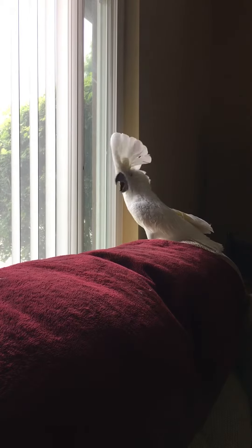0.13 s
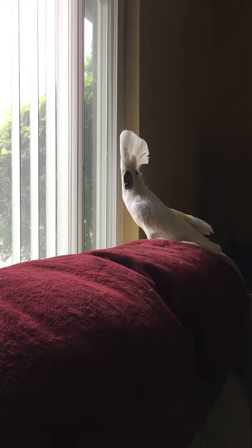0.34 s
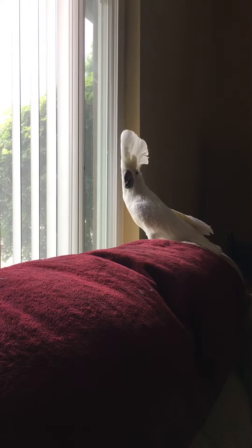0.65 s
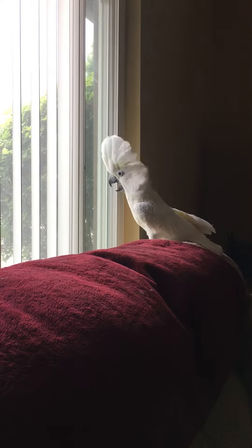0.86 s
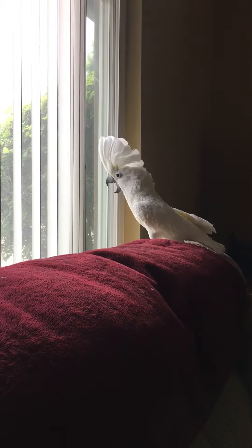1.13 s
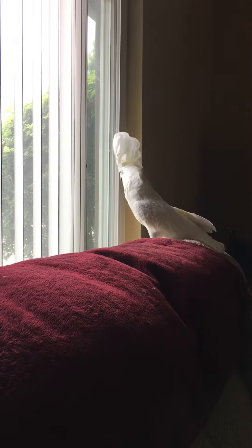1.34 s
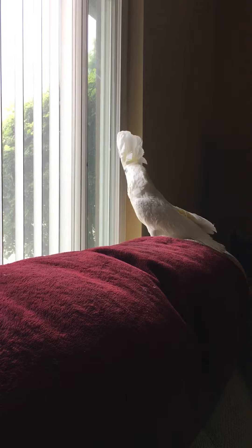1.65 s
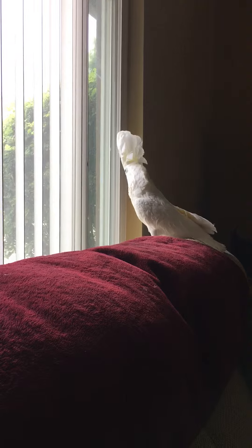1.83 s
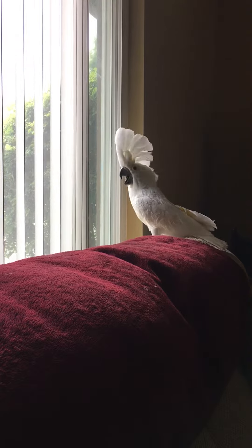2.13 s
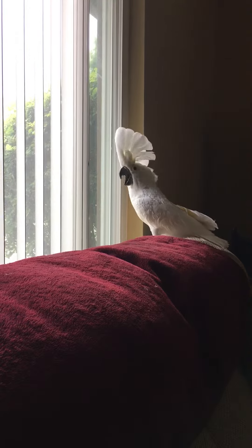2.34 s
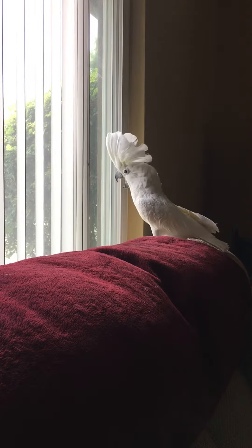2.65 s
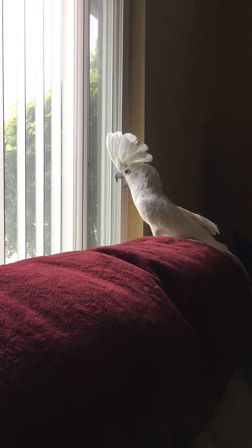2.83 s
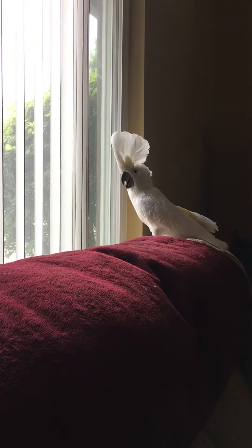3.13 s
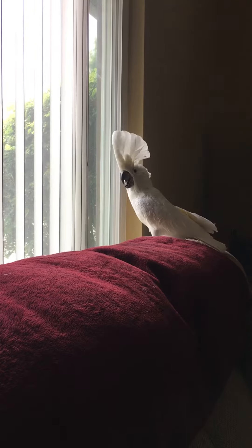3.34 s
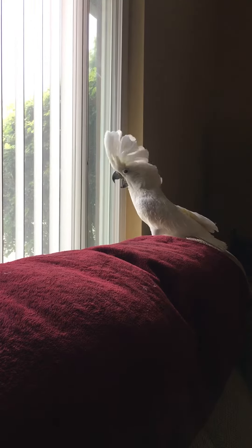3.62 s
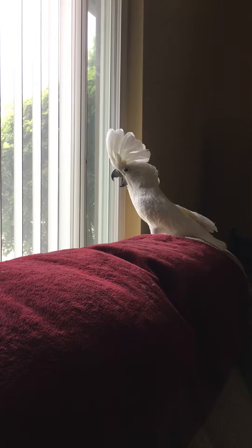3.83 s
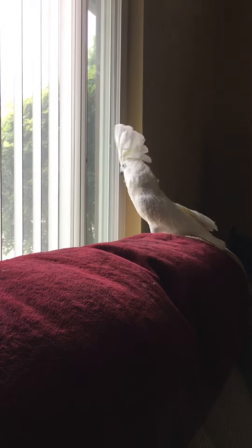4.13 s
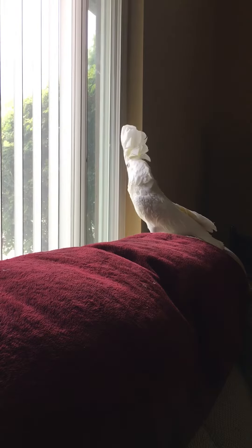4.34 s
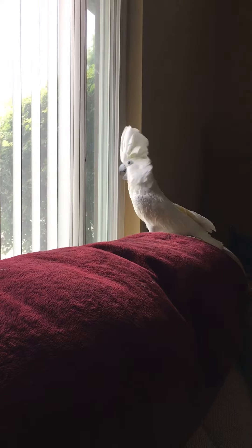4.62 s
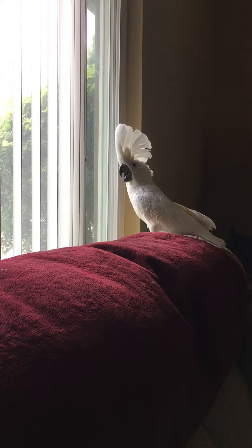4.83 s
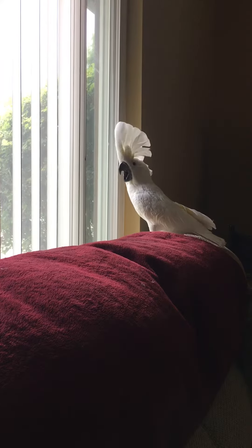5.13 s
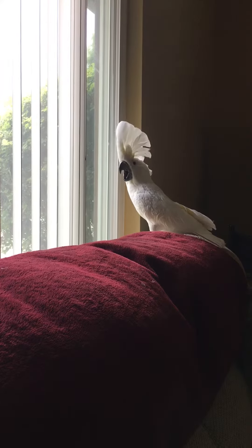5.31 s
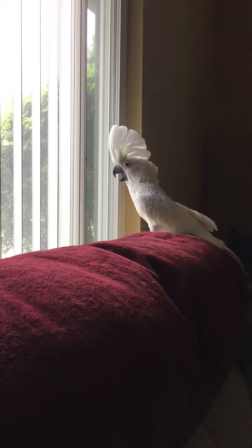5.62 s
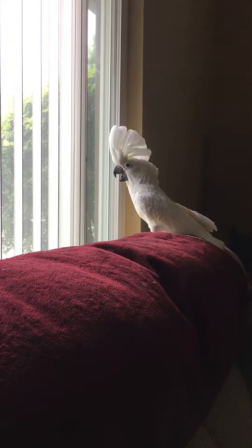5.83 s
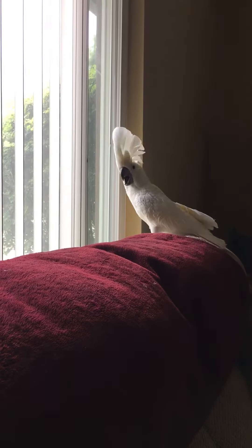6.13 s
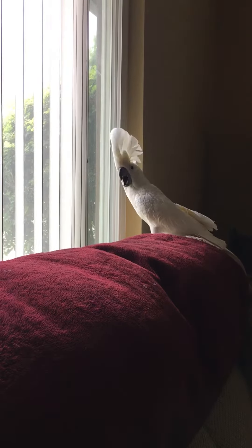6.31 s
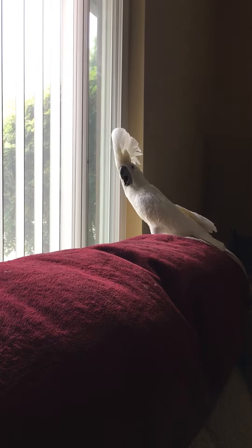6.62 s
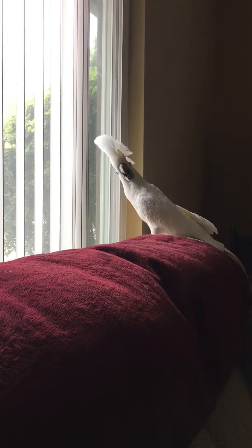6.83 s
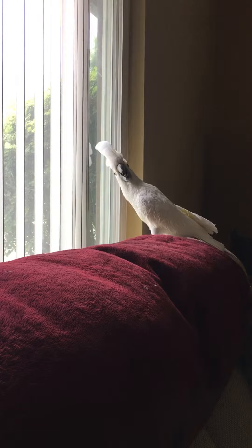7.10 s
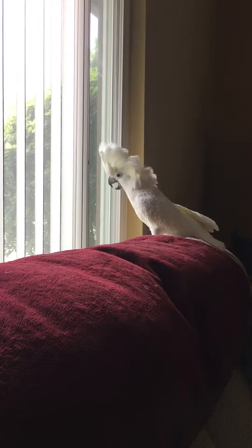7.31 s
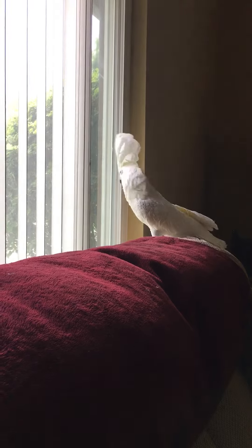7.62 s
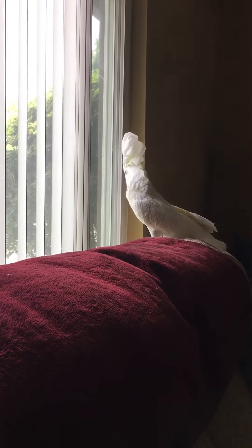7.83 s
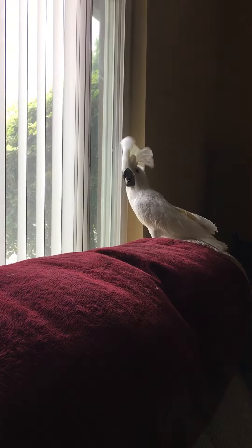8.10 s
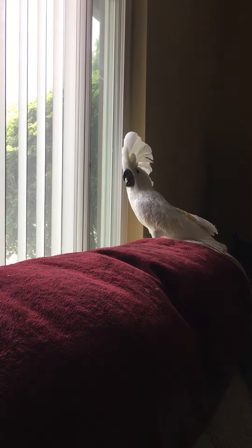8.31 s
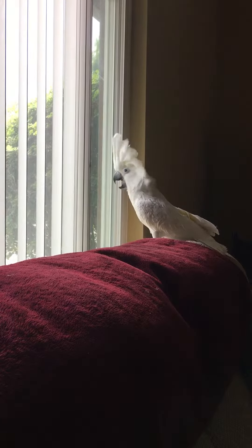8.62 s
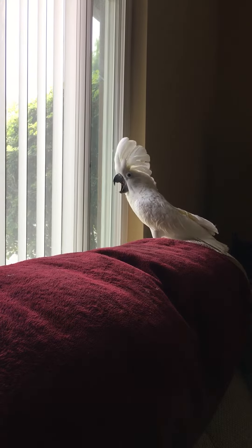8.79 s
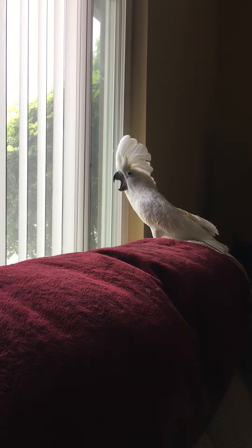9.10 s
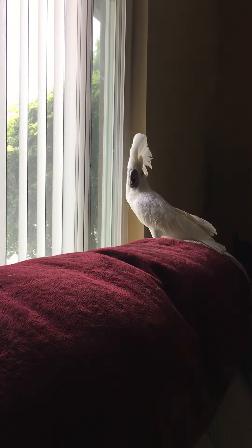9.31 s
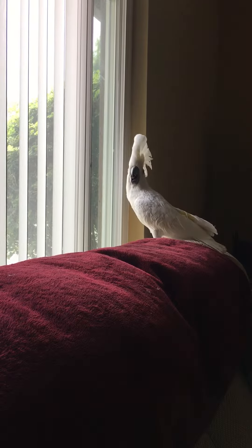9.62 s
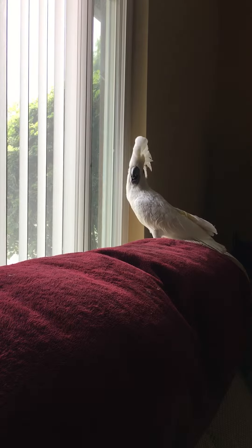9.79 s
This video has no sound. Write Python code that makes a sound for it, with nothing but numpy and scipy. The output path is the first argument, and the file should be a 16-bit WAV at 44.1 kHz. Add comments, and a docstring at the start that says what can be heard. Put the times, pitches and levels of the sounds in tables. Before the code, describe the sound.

A cockatoo screams over and over in a living room, piercing and raspy-ended, while a small dog yelps and whines further back.

```python
"""In a living room, a cockatoo on a sofa back screeches again and again, close by.
Each cry sweeps up into a piercing tone, may crack, and falls away in a rasp; thin whistles edge a few.
Its voice is a train of pulses, roughened and mixed with breath noise, then shaped by throat and beak.
Further back another animal, probably a small dog, joins in: hoarse yelps and thin gliding howls.
A soft knock, faint room noise and a wavering hum lie underneath; the room echoes both animals."""
import sys
import numpy as np
from scipy import signal
from scipy.fft import rfft, irfft
from scipy.io import wavfile
from scipy.ndimage import uniform_filter1d, minimum_filter1d

SR = 44100
rng = np.random.default_rng(int(sys.argv[2]) if len(sys.argv) > 2 else 0)


def wrap_up_sound(samples):
    """Save the sound to the file named by the first command line argument, as 16-bit audio."""
    columns = np.atleast_2d(samples).T
    # keep every value between -1 and 1, then stretch to whole-number steps
    tamed = np.clip(columns, -1, 1)
    steps = np.round(tamed * 32767).astype(np.int16)
    wavfile.write(sys.argv[1], SR, steps)


N = 438794
T = np.arange(N) / SR  # time of every sample, in s
CRACK_EDGE_S = 0.018  # fade at both ends of a crack or a strong-weak stretch


def undb(db):
    """Turn decibels into a gain."""
    return 10 ** (np.asarray(db) / 20)


def unit(x):
    """Scale to rms 1."""
    return x / np.sqrt(np.mean(x ** 2) + 1e-18)


def steady(x, size=1500):
    """Hold the running rms at 1, over a window of size samples."""
    return x / np.sqrt(uniform_filter1d(x ** 2, size) + 1e-12)


def at(points, hz):
    """Read (Hz, value) points on a log-frequency axis."""
    f, value = np.transpose(points)
    return np.interp(np.log(np.maximum(hz, 1)), np.log(f), value)


def ramp(t, length_s):
    """Rise from 0 to 1 over the given time."""
    return np.clip(t / length_s, 0, 1)


def during(start, end):
    """Find the samples between two moments, and their times."""
    span = np.flatnonzero((T >= start) & (T <= end))
    return span, T[span]


def colour(x, points, size=1024):
    """Filter with the given (Hz, dB) response, without sounding ahead of time."""
    log_gain = np.log(undb(at(points, np.fft.rfftfreq(size, 1 / SR))))
    # folding the cepstrum forward in time gives the most prompt filter with this response
    cepstrum = irfft(log_gain)
    cepstrum[1:size // 2] *= 2
    cepstrum[size // 2 + 1:] = 0
    response = irfft(np.exp(rfft(cepstrum)))
    return signal.fftconvolve(x, response)[:len(x)]


def below(x, hz, order=6):
    """Low-pass without delay."""
    sos = signal.butter(order, min(hz, 0.45 * SR), fs=SR, output="sos")
    return signal.sosfiltfilt(sos, x)


def wobble(n, hz):
    """Random motion up to about the given speed, rms 1."""
    sos = signal.butter(4, hz, fs=SR, output="sos")
    return unit(signal.sosfilt(sos, rng.standard_normal(n)))


def pulses(hz, count=24):
    """One sharp pulse per cycle, summed from overtones, and the phase of the cycle."""
    phase = 2 * np.pi * np.cumsum(hz) / SR
    wave = 0
    for k in range(1, count + 1):
        # overtones fade out just below the highest frequency that can be stored
        fade = np.clip((SR / 2 - k * hz) / 2000, 0, 1)
        wave = wave + np.cos(k * phase) * fade
    return wave, phase


def perform(voice, *tables):
    """Lay all calls of one voice on the time line."""
    out = np.zeros(N)
    for controls in zip(*tables):
        span, call = voice(*controls)
        out[span] += call
    return out


def background(floor_db=-60, hum_hz=57.4, hum_db=-60.5):
    """Soft coloured noise of a quiet room, and the wavering hum of an appliance."""
    # tone of the quiet room, overall level set apart: f/Hz, relative level/dB
    room_tone = [(20, -23), (45, -14.5), (65, -2), (90, -14), (200, -19.5), (500, -21), (2000, -29.5),
                 (8000, -36), (15000, -45.5)]
    hum = unit(np.sin(2 * np.pi * hum_hz * T) * (1 + 0.15 * wobble(N, 3.4)))
    noise = unit(colour(rng.standard_normal(N), room_tone))
    return undb(floor_db) * noise + undb(hum_db) * hum


def effort(t, row, held_pitch):
    """One screech's course: tighten up to pitch, hold, then run out of pressure in a rasp."""
    # the voice cracks in mid-cry: start/s, end/s, roughness (0-1), level change/dB
    crack_rows = [(-0.02, 0.066, 0.47, 8), (0.062, 0.119, 0.65, -0.5), (2.405, 2.462, .6, 1.5),
                  (3.736, 3.773, 0.39, -1.5), (3.94, 4.064, 0.55, -3), (4.094, 4.157, 0.37, -3.5),
                  (5.19, 5.251, 0.51, -4), (8.763, 8.895, 0.75, -0.5), (8.993, 9.051, 0.68, -5.5),
                  (9.78, 10.1, 0.76, -2.5)]
    sweep_depth, sweep_curve = 0.48, 3.1  # share of the pitch missing at the start
    attack_s, attack_db, attack_curve = 0.083, -21.5, 3.12
    settle_s, held_rough = 0.16, 0.03  # roughness clears to this small rest
    waver_hz, waver_share = 14.02, 0.00401
    tongue_hz, tongue_db = 13, 1.8
    break_s, rasp_rough, rasp_fall_per_s = 0.025, 0.78, 1.5
    rasp_fade_db_per_s, rasp_throat_db, rasp_treble_db = -88.5, 3.5, -0.5

    start, breaks, end, sweep_s, onset_rough, early_db, late_db, rasp_db, *colours, _ = row
    age, spent = t - start, np.maximum(t - breaks, 0)
    rasp = ramp(spent, break_s)
    cracks = [(ramp(np.minimum(t - a, b - t), CRACK_EDGE_S), depth, db) for a, b, depth, db in crack_rows]

    def across(early_late):
        return np.interp(t, [start, breaks], early_late)

    def slow_motion(hz):
        # drawn over two seconds, so that short cries get a fair share of slow motion
        return wobble(2 * SR, hz)[-len(t):]

    # pitch
    sweep = 1 - sweep_depth * (1 - ramp(age, sweep_s)) ** sweep_curve
    hz = np.interp(t, *np.transpose(held_pitch)) * sweep * np.exp(-rasp_fall_per_s * spent)
    hz = hz * (1 + waver_share * slow_motion(waver_hz))
    # level
    level_db = across([early_db, late_db])
    level_db = level_db + attack_db * (1 - ramp(age, attack_s)) ** attack_curve
    level_db = level_db + sum(on * db for on, _, db in cracks)
    level_db = level_db + rasp_db * rasp + rasp_fade_db_per_s * spent
    # tongue and beak never hold quite still
    throat_db = across(colours[:2]) + rasp_throat_db * rasp + tongue_db * slow_motion(tongue_hz)
    treble_db = across(colours[2:]) + rasp_treble_db * rasp + tongue_db * slow_motion(tongue_hz)
    # roughness
    rough = held_rough + onset_rough * (1 - ramp(age, settle_s)) + rasp_rough * rasp
    rough = np.maximum(rough, sum(on * depth for on, depth, _ in cracks))
    return hz, level_db, throat_db, treble_db, rough


def screech(row, held_pitch, beak_hz=4250, beak_half_width_hz=380, jitter=0.0643, jitter_hz=330,
            quiver=0.0021, shimmer=0.13, creak=0.78, drift=1.1):
    """The syrinx, a bird's voice organ, pulses cleanly or roughly; throat and beak ring with it."""
    # windpipe, throat and open beak: f/Hz, level/dB
    bird_tract = [(200, -33.5), (600, -20), (1050, -15), (1500, -6), (2100, -0.5), (2600, -3.5), (3200, 1),
                  (4200, -6.5), (5200, -8.5), (6200, -14.5), (7800, -18.5), (9600, -30), (12500, -35.5),
                  (15500, -46.5)]
    # the syrinx beats strong-weak, adding lines at half the pitch: start/s, end/s, depth (half the swing)
    doubling_rows = [(3.672, 3.7, 0.6), (3.994, 4.18, 0.39), (8.863, 9.047, 0.3)]
    start, _, end, *_, beak_db = row
    span, t = during(start, end)
    hz, level_db, throat_db, treble_db, rough = effort(t, row, held_pitch)
    n = len(span)

    # the tone stays pure until the strain is high, then breaks up quickly
    rough = np.clip(rough, 0, 1)
    chaos = rough ** 2 * (2 - rough)
    # slack membranes flap unevenly until they tighten onto the pitch
    chaos = np.maximum(chaos, np.clip((900 - hz) / 400, 0, 0.5))
    hz = hz * (1 + quiver * wobble(n, 93) + jitter * chaos * wobble(n, jitter_hz))
    wave, phase = pulses(hz)

    # the weak beat comes and goes and lags unevenly, so the half lines waver
    doubling = sum(depth * ramp(np.minimum(t - a, b - t), CRACK_EDGE_S) for a, b, depth in doubling_rows)
    half_cycle = np.cos(phase / 2 + 0.88 * wobble(n, 41))
    weak_beat = doubling * (1 + 0.56 * wobble(n, 49)) * half_cycle
    wave = unit(wave) * (1 + 2 * weak_beat)

    # turbulence escapes once a cycle and grows with the chaos
    air = unit(rng.standard_normal(n) * (1 + np.cos(phase)))
    noisy = 0.6 * chaos ** 2
    source = np.sqrt(1 - noisy) * wave + np.sqrt(noisy) * air
    # under strain the membranes slam in loose groups of four cycles: a torn, creaking rasp
    groups = np.exp(creak * chaos * np.cos(phase / 4 + drift * wobble(n, 50)))
    flicker = 1 + shimmer * chaos * wobble(n, 290)
    voice = colour(source * groups * flicker, bird_tract)

    # tongue and beak shift the weight between three bands
    low, up_to_mid = below(voice, 2502), below(voice, 3824)
    treble = voice - up_to_mid
    peak = signal.iirpeak(beak_hz, beak_hz / beak_half_width_hz / 2, fs=SR)
    treble = treble + (undb(beak_db) - 1) * signal.filtfilt(*peak, treble)
    throat = undb(throat_db) * steady(up_to_mid - low)
    mixed = steady(low) + throat + undb(treble_db) * steady(treble)
    edges = ramp(np.minimum(t - start, end - t), 0.036)
    return span, edges * undb(level_db) * mixed


def dog_voice(hz, rough, jitter=0.117, jitter_hz=140, quiver=0.0078, shimmer=0.06,
              second_db=-12, overtones_db=-13, air_db=-11):
    """The dog's vocal folds and throat, from hoarse to clear; rms 1."""
    # the dog's throat, as it colours the overtones: f/Hz, level/dB
    dog_tract = [(300, -22), (600, -22.5), (900, -13.5), (1220, 9), (1400, 4.5), (1560, 8.5), (1750, -8),
                 (2100, -8), (2500, 4.5), (3400, -19), (5000, -19.5), (6500, -13), (9000, -26.5),
                 (15000, -43.5)]
    n, rough = len(hz), np.clip(rough, 0, 1)
    hz_shaken = hz * (1 + quiver * wobble(n, 35) + jitter * rough * wobble(n, jitter_hz))
    wave, phase = pulses(hz_shaken)
    # the octave lights up as it slides through the throat resonance
    octave = undb(second_db + at(dog_tract, 2 * hz)) * np.sin(2 * phase)
    clear = unit(np.cos(phase) + octave)
    # only when the folds slap shut do upper overtones and breath noise join in
    slap = unit(colour(wave - np.cos(phase), dog_tract))
    air = unit(colour(rng.standard_normal(n) * (1 + np.cos(phase)), dog_tract))
    voice = clear + rough * (undb(overtones_db) * slap + undb(air_db) * air)
    return steady(voice * (1 + shimmer * rough * wobble(n, 130)))


def bark(row):
    """A short, hoarse yelp: pitch leaps up, loudness peaks early and fades."""
    start_hz, rise_s = 712.3, 0.027
    attack_s, attack_db, fade_db_per_s, release_s = 0.035, -30, -100, 0.03
    rough_shares = [1.7, 0.75, 1.2]  # gruff at first, clearest at its peak
    start, length, top_hz, level_db, rough = row
    span, t = during(start, start + length)
    age = t - start
    rough = rough * np.interp(age, [0, attack_s, length], rough_shares)
    hz = top_hz + (start_hz - top_hz) * np.exp(-age / rise_s)
    level_db = level_db + attack_db * (1 - ramp(age, attack_s))
    level_db = level_db + fade_db_per_s * np.maximum(age - attack_s, 0)
    return span, undb(level_db) * ramp(length - age, release_s) * dog_voice(hz, rough)


def howl(row):
    """A thin, clear tone that slides to a held pitch, then bends ever faster to its last one."""
    slide_s, bend_curve, fade_db_per_s = 0.11, 1.6, -10.5
    attack_s, release_s, first_rough, held_rough = 0.025, 0.06, 0.38, 0.08
    start, end, first_hz, held_hz, last_hz, first_db, held_db = row
    span, t = during(start, end)
    age = t - start
    slide = 1 - ramp(age, slide_s)
    bend = ramp(age - slide_s, end - start - slide_s) ** bend_curve
    hz = held_hz + (first_hz - held_hz) * slide + (last_hz - held_hz) * bend
    gain = undb(held_db + (first_db - held_db) * slide + fade_db_per_s * age)
    edges = ramp(age, attack_s) * ramp(end - t, release_s)
    return span, gain * edges * dog_voice(hz, held_rough + (first_rough - held_rough) * slide)


def whistle(row, overtone_db=-38, edge_s=0.062, curve=4.1):
    """A nearly pure tone from the syrinx that glides and levels off."""
    start, end, first_hz, last_hz, level_db = row
    span, t = during(start, end)
    hz = last_hz + (first_hz - last_hz) * (1 - ramp(t - start, end - start)) ** curve
    wave, phase = pulses(hz * (1 + 0.0057 * wobble(len(span), 93)), count=9)
    gain = undb(level_db) * ramp(np.minimum(t - start, end - t), edge_s)
    return span, gain * (unit(np.sin(phase)) + undb(overtone_db) * unit(wave))


def knocks(rise_s=0.03):
    """Something bumps softly and hums for a moment: a decaying sine with a soft start."""
    # soft knocks, t60 being the time to fade by 60 dB: t/s, f/Hz, level before the fade/dB, t60/s
    bumps = [(3.74, 188, -33, 0.37)]
    out = np.zeros(N)
    for start, hz, db, t60 in bumps:
        age = np.maximum(T - start, 0)
        gain = undb(db - 60 * age / t60) * ramp(age, rise_s)
        out += gain * np.sin(2 * np.pi * hz * age)
    return out


def room(x, direct_db, early_db, tail_db, early_s):
    """Direct sound, scattered early reflections, and a tail whose bands fade at their own speeds."""
    # how long the living room rings, as time to fade by 60 dB: f/Hz, t60/s
    ring_times = [(200, 0.13), (1000, 0.89), (2000, 0.7), (4000, 0.61), (8000, 0.61), (15000, 0.84)]
    t = T[:SR]
    noise, tail, lower = rng.standard_normal(SR), 0, 0
    for edge_hz in 350 * 2.0 ** np.arange(7):  # octave bands
        upto = below(noise, edge_hz, order=3)
        fade = undb(-60 * t / at(ring_times, edge_hz / np.sqrt(2)))
        tail = tail + (upto - lower) * fade
        lower = upto
    tail = tail * ramp(t, 0.025)
    # about one sample in fifty carries a reflection
    early = rng.standard_normal(SR) * (rng.random(SR) < 0.02) * (t > 0.002) * np.exp(-t / early_s)
    response = undb(early_db) * early / np.linalg.norm(early)
    response = response + undb(tail_db) * tail / np.linalg.norm(tail)
    return undb(direct_db) * x + signal.fftconvolve(x, response)[:N]


def scene():
    """The near bird and the farther dog share one room."""
    # one row per screech, levels before the room: start/s, break into rasp/s, end/s, upward sweep/s,
    # added roughness at the start (0-1), early level/dB, late level/dB, rasp level change/dB,
    # early throat band/dB, late throat band/dB, early treble/dB, late treble/dB, beak ring/dB
    screech_rows = [(-0.25, 0.272, 0.37, .14, .6, -16.5, -14.5, -6.5, -2.5, -9.5, -8, -6.5, 0.5),
                    (0.955, 1.512, 1.595, .11, 0.72, -16, -16.5, -1, -1, -12.5, 1.5, -1.5, 10),
                    (2.354, 2.774, 2.91, .15, 0.49, -13.5, -16, 1.5, -5, -7, -2.5, -2, 7),
                    (3.635, 4.178, 4.275, .15, 0.86, -11.5, -13.5, 3, -1.5, -7, -6.5, -8, 3.5),
                    (4.975, 5.471, 5.59, 0.14, 0.76, -12, -13.5, -3, -6, -10, -5.5, -6, 2.5),
                    (6.187, 6.746, 6.84, .11, 0.52, -10.5, -13.5, -5, -5, -16.5, -6, -8.5, 0.5),
                    (7.516, 7.925, 8.03, .15, 0.69, -16, -12.5, -1, -0.5, -16, 2, -4, 8),
                    (8.725, 9.219, 9.32, .09, 0.52, -9, -15, 1, -3, -2.5, -3, -5.5, 2),
                    (9.798, 10.3, 10.4, 0.14, 0.89, -30, -10.5, 0, -4, 17, -5, 21, 1)]
    # pitch that the bird holds, one list per screech: t/s, f/Hz
    held_pitches = [
        [(0.0, 1001), (0.102, 1025), (0.112, 1049), (0.124, 1024), (0.192, 1007), (0.245, 954)],
        [(1.06, 1029), (1.166, 1035), (1.456, 1033), (1.505, 1044)],
        [(2.47, 1096), (2.632, 1070), (2.702, 1060), (2.71, 1050), (2.766, 1040), (2.785, 1029)],
        [(3.75, 1084), (3.96, 1018), (3.97, 1056), (3.988, 1052), (4.004, 1027), (4.018, 1053), (4.1, 1051)],
        [(5.09, 1038), (5.196, 1018), (5.204, 999), (5.236, 1058), (5.258, 1037), (5.456, 1021), (5.47, 997)],
        [(6.29, 1070), (6.462, 1033), (6.74, 995.3)],
        [(7.62, 1090), (7.704, 1077), (7.716, 1109), (7.912, 1079), (7.925, 1063)],
        [(8.9, 1163), (8.912, 1167), (8.984, 1120), (9.074, 1169), (9.086, 1140), (9.142, 1148), (9.22, 1062)],
        [(9.9, 1009)],
    ]
    # yelps, before attack, fade and room: start/s, length/s, top f/Hz, level/dB, base roughness (0-1)
    bark_rows = [(0.273, 0.24, 1126, -11.5, 0.57), (1.21, 0.27, 1117, -9, 0.59),
                 (2.011, 0.18, 1085, -5.5, .45), (2.627, 0.29, 1103, -9.5, 0.73),
                 (3.649, 0.084, 825, -12, 0), (4.006, 0.081, 799, -16, 0.2),
                 (4.622, 0.15, 986.4, -10, 0.73), (5.467, .14, 842.5, -16.5, 0.32),
                 (6.712, 0.193, 1119, -10.5, 0.47), (7.289, 0.19, 1097, -6, 0.61),
                 (7.92, 0.18, 1104, -8.5, 0.6), (8.471, 0.14, 835.4, -8.5, 0.25),
                 (9.509, .19, 1117, -8, 0.53)]
    # howls, before fade and room: start/s, end/s, first f/Hz, held f/Hz, last f/Hz,
    # first level/dB, held level/dB
    howl_rows = [(0.41, 0.874, 1032, 800, 607, -7, -24.5), (1.351, 1.849, 994, 768.4, 639, -6, -29),
                 (2.761, 3.36, 1009, 696.7, 482, -29.5, -30.5), (3.745, 4.029, 783, 619, 520, -31, -33),
                 (4.107, 4.3, 793, 663, 604, -25, -34.5), (4.723, 5.035, 895, 657, 473, -31, -32),
                 (5.581, 6.314, 811, 655.3, 476, -29.5, -34), (6.3, 6.523, 483, 522, 563, -33, -41.5),
                 (7.45, 7.736, 1014, 701, 611, -9.5, -34.5), (8.047, 8.268, 1024, 706, 662, -15, -35.5),
                 (8.6, 8.974, 770, 518, 449, -32, -35), (8.982, 9.21, 493, 648, 578, -39, -33.5)]
    # thin whistles at the edge of a screech: start/s, end/s, first f/Hz, last f/Hz, level/dB
    whistle_rows = [(2.28, 2.476, 1392, 1530, -20.5), (4.05, 4.375, 3000, 2430, -25.5),
                    (4.92, 5.082, 1430, 1487, -17), (7.84, 8.002, 1930, 1510, -30.5)]
    bird = perform(screech, screech_rows, held_pitches) + perform(whistle, whistle_rows)
    dog = perform(bark, bark_rows) + perform(howl, howl_rows)
    near = room(bird, direct_db=-1.0, early_db=-7.0, tail_db=-10.0, early_s=0.03)
    far = room(dog, direct_db=-5, early_db=-3.5, tail_db=-11.0, early_s=0.024)
    return (near + far + knocks() + background())[None]


def record(dry, ceiling=0.89, size=220, top_hz=15750):
    """A limiter smoothly ducks the highest peaks; a steep low-pass cuts the top."""
    gain = np.minimum(1, ceiling / (np.abs(dry) + 1e-9))
    gain = minimum_filter1d(gain, 2 * size)
    gain = uniform_filter1d(uniform_filter1d(gain, size), size)
    sos = signal.ellip(8, 0.05, 60, top_hz, fs=SR, output="sos")
    return signal.sosfiltfilt(sos, dry * gain)


dry = scene()
out = record(dry)
wrap_up_sound(out)
```